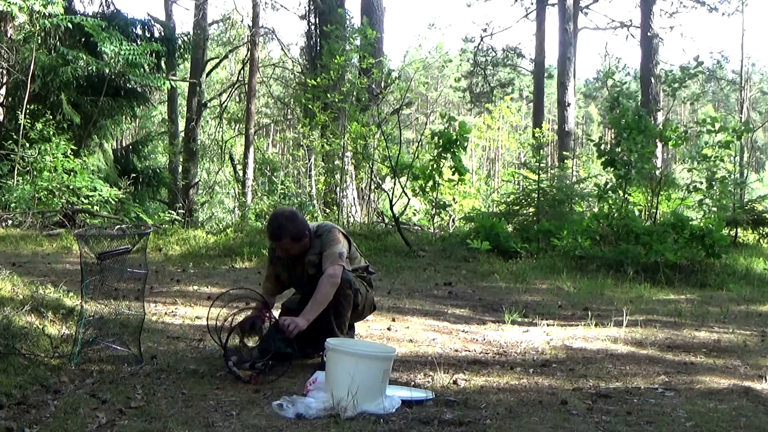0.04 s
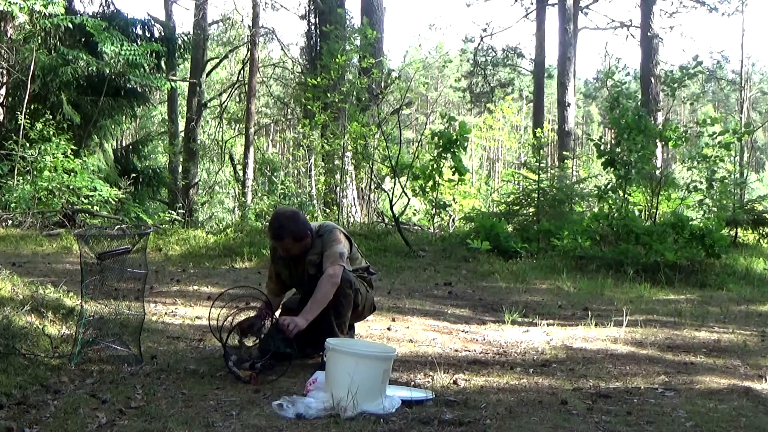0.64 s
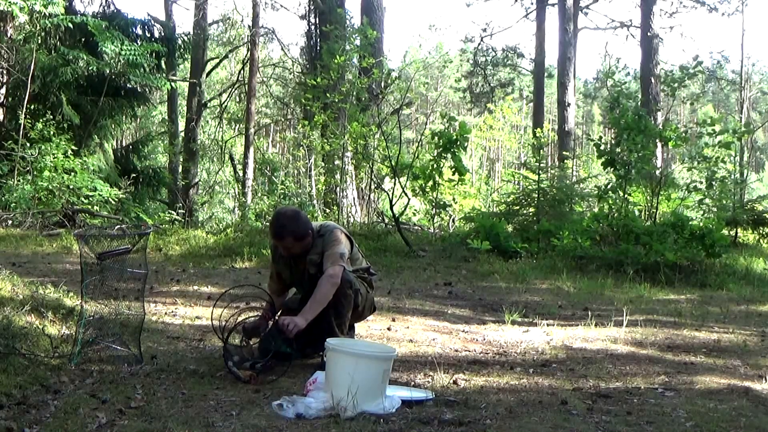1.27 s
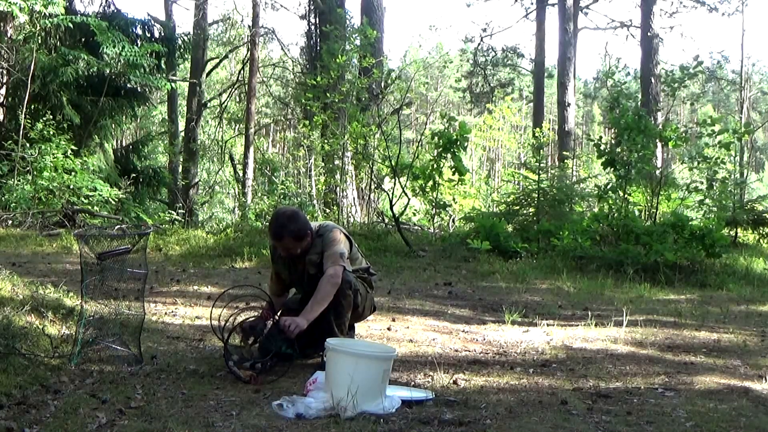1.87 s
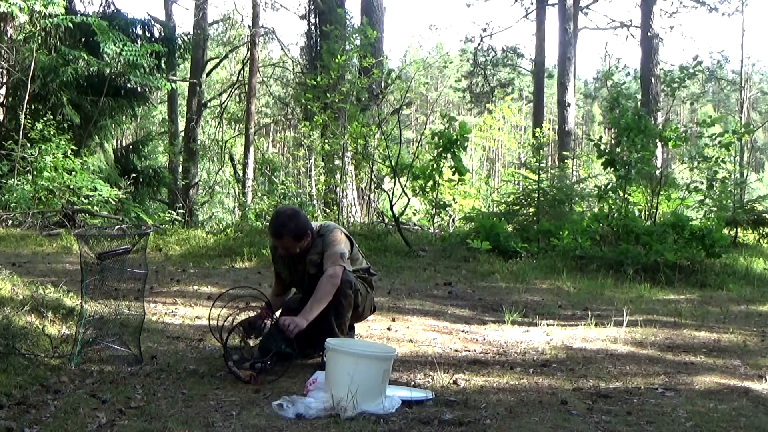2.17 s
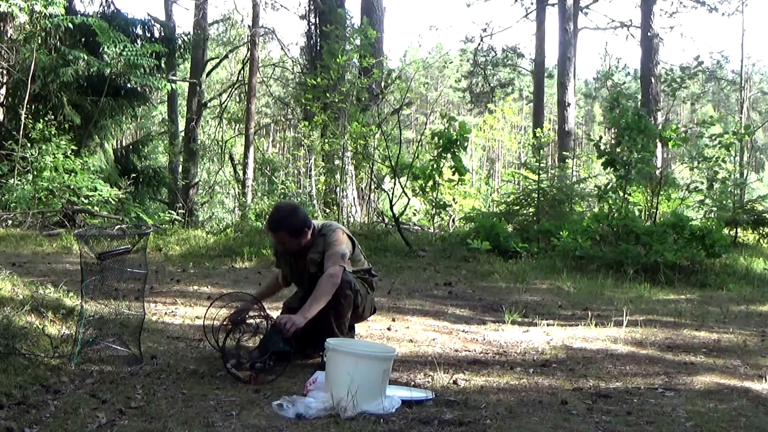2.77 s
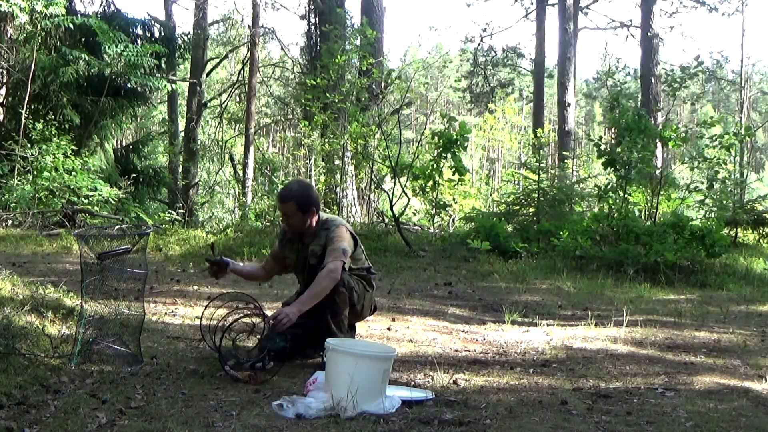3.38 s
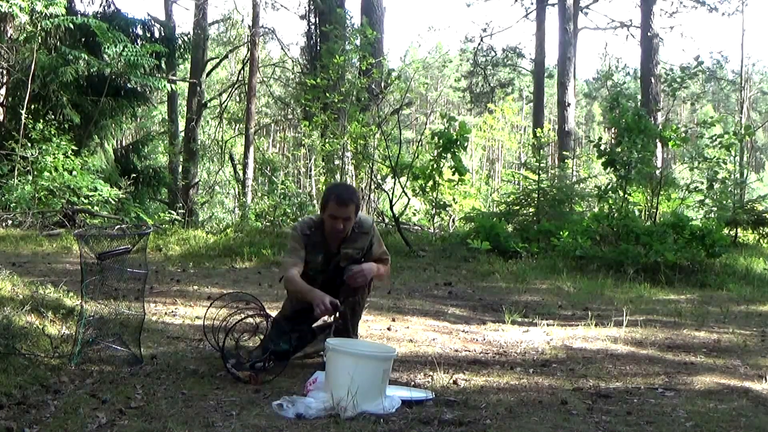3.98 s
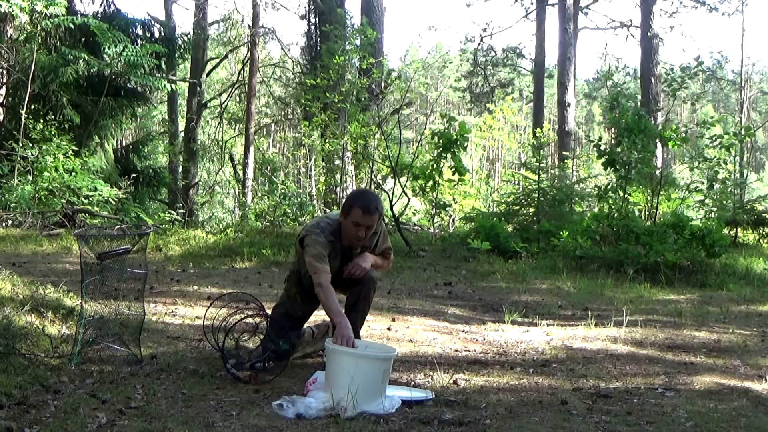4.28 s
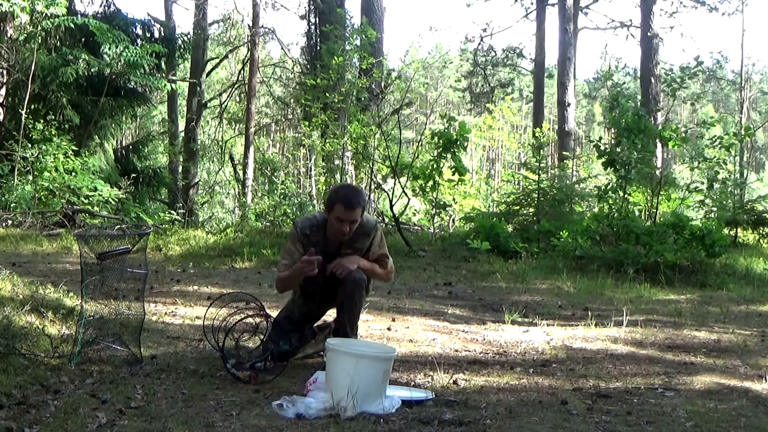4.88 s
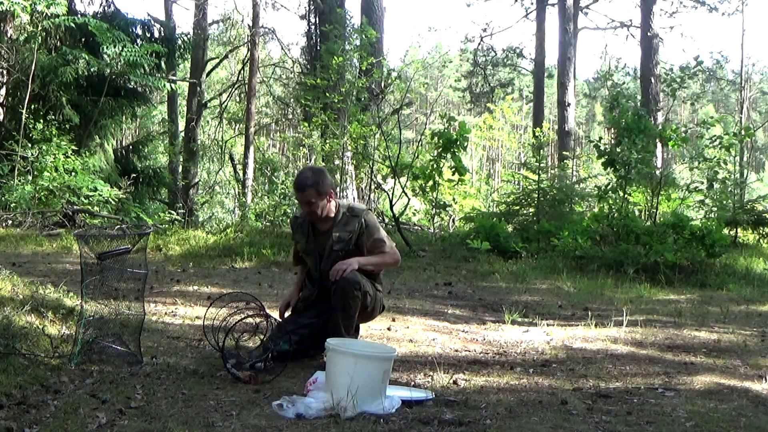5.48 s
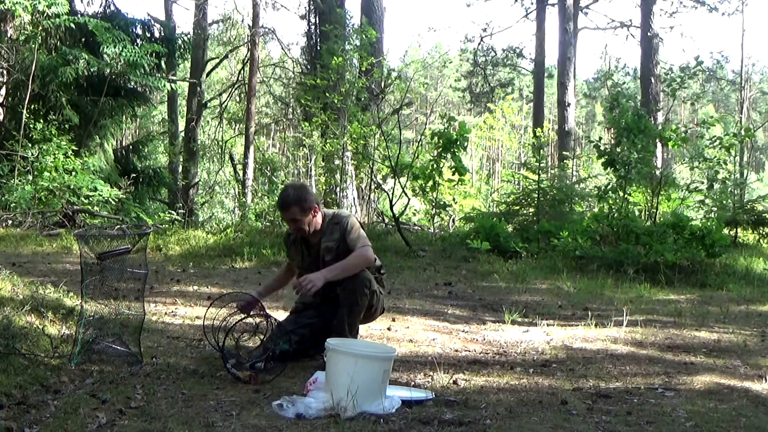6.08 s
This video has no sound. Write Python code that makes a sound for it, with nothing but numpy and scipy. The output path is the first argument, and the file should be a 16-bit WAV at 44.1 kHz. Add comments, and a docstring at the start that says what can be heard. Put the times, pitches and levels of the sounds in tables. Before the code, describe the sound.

A quiet forest hush with faint birdsong, soft clicks and rustles of a net trap, and something small clattering into a plastic bucket.

```python
"""A quiet forest: trees hush steadily and a far songbird whistles one phrase, echoed by the trunks.
Someone kneels and works on a hooped net trap: net and clothes rustle, hoops and twigs tick,
shifting weight thuds on soft soil. A small object drops into a plastic bucket and rattles to rest;
the thin wall clatters, the bottom booms. Lighter knocks on the bucket follow."""
import sys
import numpy as np
from scipy import signal
from scipy.fft import rfft, irfft, next_fast_len
from scipy.io import wavfile
from scipy.ndimage import uniform_filter1d

SR = 44100
rng = np.random.default_rng(int(sys.argv[2]) if len(sys.argv) > 2 else 0)


def to_wav(s):
    """Save 16-bit WAV."""
    ch = np.atleast_2d(s).T  # columns
    pcm = np.round(np.clip(ch, -1, 1) * 32767)  # PCM
    wavfile.write(sys.argv[1], SR, pcm.astype(np.int16))


N = 270929
T = np.arange(N) / SR

# Movements of net and clothes. Each row: middle in seconds, length in seconds, relative level in dB,
# band centre in Hz.
MOVEMENTS = [(2.6, 0.64, -63, 8500), (3.48, 0.26, -68, 9000), (4.283, 0.34, -66, 5500),
             (4.804, 0.16, -52, 1210), (5.177, 0.31, -56, 1190), (5.497, .25, -62, 8000),
             (5.62, 0.53, -61, 1990), (5.921, 0.15, -57.5, 6040)]


def undb(db):
    """Decibels to gain."""
    return 10 ** (np.asarray(db) / 20)


def unit(x):
    """Scale to rms 1."""
    return x / (np.std(x) + 1e-12)


def add(out, start_s, x):
    """Mix x into out from start_s."""
    i = int(np.clip(start_s * SR, 0, N - 1))
    out[i:i + len(x)] += x[:N - i]


def butter(x, hz, kind, order=2):
    """High- or low-pass."""
    return signal.sosfilt(signal.butter(order, hz, kind, fs=SR, output="sos"), x)


def colour(x, points):
    """Minimum-phase filter through (Hz, dB) points."""
    hz, db = np.transpose(points)
    size = 2 * next_fast_len(N)
    grid_hz = np.maximum(np.fft.rfftfreq(size, 1 / SR), 1)
    gain = undb(np.interp(np.log(grid_hz), np.log(hz), db))
    cepstrum = irfft(np.log(gain))
    cepstrum[1:size // 2] *= 2
    cepstrum[size // 2 + 1:] = 0
    return irfft(rfft(x, size) * np.exp(rfft(cepstrum)))[:N]


def resonate(x, hz, width_hz):
    """One resonance, gain 1 at its centre."""
    return signal.lfilter(*signal.iirpeak(hz, hz / width_hz, fs=SR), x)


def walk(rate_hz):
    """Smooth random wander, spread 1."""
    hold = int(SR / rate_hz)
    steps = np.repeat(rng.standard_normal(N // hold + 1), hold)
    return unit(uniform_filter1d(uniform_filter1d(steps, hold), hold)[:N])


def fade(t60_s):
    """Exponential decay, 60 dB down at its end."""
    return np.exp(-np.log(1000) * T[T < t60_s] / t60_s)


def ring(hz, t60_s):
    """Struck mode: a decaying sine."""
    shape = fade(t60_s)
    return shape * np.sin(2 * np.pi * hz * T[:len(shape)])


def burst(t60_s, rise_s=0.00044):
    """Contact noise: abrupt start, exponential decay."""
    shape = fade(t60_s)
    return rng.standard_normal(len(shape)) * shape * (1 - np.exp(-T[:len(shape)] / rise_s))


def scatter(x, t60_s):
    """Dense reflections: convolution with decaying noise of unit energy."""
    shape = fade(t60_s)
    response = rng.standard_normal(len(shape)) * shape
    return signal.fftconvolve(x, response / np.linalg.norm(response))[:N]


def widen(x, lag_s=0.00298):
    """Sound scattered by the surroundings arrives differently left and right."""
    # Stereo width. Each row: frequency in Hz, side minus mid in dB.
    side_curve = [(100, -11), (350, -16), (1200, -11), (2400, -12), (4500, -25), (9000, -23), (14000, -47)]
    side = np.zeros(N)
    add(side, lag_s, scatter(x, t60_s=0.02))
    side = colour(side, side_curve)
    return np.array([x + side, x - side])


def forest(mid_db=-53, sway_db=0.25, side_db=-0.5, hum_hz=52.2, drift_hz=0.33, hum_db=-69):
    """Even hush of far trees and hiss, swaying slightly, with a faint low hum."""
    # Hush spectrum. Each row: frequency in Hz, relative density in dB.
    spectrum = [(20, -9.5), (45, -3.5), (85, -9), (160, -5.5), (400, -0.54), (1000, -3.5), (1600, -11),
                (3000, -17.5), (5300, -21.5), (6600, -17.5), (8600, -18.5), (11000, -27), (15500, -34)]
    # Stereo width. Each row: frequency in Hz, relative side gain in dB.
    side_curve = [(60, -22), (110, -14.5), (200, -12), (380, -13), (700, -9), (1290, -4.5), (2380, -5),
                  (4400, -5.5), (8120, -8), (15000, -37.5)]
    mid, side = (colour(rng.standard_normal(N), spectrum) for _ in range(2))
    side = undb(side_db) * colour(side, side_curve)
    hush = np.array([mid + side, mid - side]) / np.std(mid)
    hush *= undb(mid_db + sway_db * walk(rate_hz=1.43))
    hum = np.sin(2 * np.pi * np.cumsum(hum_hz + drift_hz * walk(rate_hz=3.73)) / SR)
    return hush + undb(hum_db) * hum


def bird(trill_hz=70, swing_hz=260, arch_hz=69.4, flutter=0.41, gain_db=-1, echo_db=-2, echo_t60_s=0.45):
    """Gliding whistles, some trilled, smeared by echoes from the trunks."""
    # Each row: start in seconds, length in seconds, relative level in dB, start pitch in Hz,
    # end pitch in Hz, trill depth from 0 to 1.
    notes = [(2.165, 0.057, -63, 3050, 2760, 0), (2.62, 0.048, -58.5, 2130, 2640, .3),
             (2.8, .04, -61, 3010, 2190, 0.1), (2.83, 0.036, -60, 2280, 2710, 0),
             (3.076, 0.047, -55.5, 2290, 2790, 0), (3.375, .055, -62.5, 2150, 1990, 0),
             (3.547, 0.043, -61, 3300, 3570, 0), (3.82, .025, -55, 3210, 2400, 0.1),
             (3.929, .03, -57, 2445, 2800, 0.93), (4.091, .085, -57, 2596, 2390, 0.85),
             (4.213, 0.044, -57.5, 2700, 1960, 0)]
    song = np.zeros(N)
    for start_s, length_s, db, from_hz, to_hz, depth in notes:
        t = T[T < length_s]
        trill = depth * np.sin(2 * np.pi * trill_hz * t)
        glide_hz = from_hz + (to_hz - from_hz) * t / length_s
        hz = glide_hz + arch_hz * np.sin(np.pi * t / length_s) + swing_hz * trill
        shape = signal.windows.tukey(len(t), 0.6) * (1 + trill / 2)
        add(song, start_s, undb(db + gain_db) * shape * np.sin(2 * np.pi * np.cumsum(hz) / SR))
    song *= 1 + flutter * walk(rate_hz=250)  # slight hoarseness
    echoes = np.array([scatter(song, echo_t60_s) for _ in range(2)])
    return song + undb(echo_db) * echoes


def rustles(grain_db=4.0, grain_samples=32, width_ratio=0.83, gain_db=-1.5, top_hz=10500):
    """Threads catch on each other: dense, uneven clicks swell with each movement."""
    out = np.zeros(N)
    for middle_s, length_s, db, hz in MOVEMENTS:
        n = int(length_s * SR)
        sizes_db = grain_db * np.minimum(rng.exponential(size=n // grain_samples + 1), 4)
        grains = np.repeat(undb(sizes_db), grain_samples)[:n] * rng.standard_normal(n)
        band = unit(resonate(grains, hz, width_ratio * hz))
        add(out, middle_s - length_s / 2, undb(db + gain_db) * np.hanning(n) * band)
    return butter(out, top_hz, "low", order=3)


def weight_shift(start_s=4.9, gap_s=0.045, count=10, jitter=0.252, db=-41, scatter_db=2.0, hz=62.4):
    """Weight moves from knee to foot: an uneven run of thuds, as rows for bumps()."""
    return [(start_s + gap_s * (k + jitter * when), db + scatter_db * size, hz * np.exp(0.08 * pitch))
            for k, (when, size, pitch) in enumerate(rng.standard_normal((count, 3)))]


def bumps(t60_at_70hz_s=0.065, rise_s=0.0037, gain_db=4.0):
    """Soft soil gives low, heavily damped thuds."""
    # Each row: start in seconds, relative level in dB, pitch in Hz.
    thuds = [(.252, -31.5, 226), (.257, -42, 150), (5.06, -35.5, 79), (5.302, -38, 72.4), (5.386, -41, 70)]
    out = np.zeros(N)
    for start_s, db, hz in thuds + weight_shift():
        thud = ring(hz, t60_at_70hz_s * np.sqrt(70 / hz))
        onset = 1 - np.exp(-T[:len(thud)] / rise_s)
        add(out, start_s, undb(db + gain_db) * thud * onset)
    return out


def snags(rate_per_s=5, db=-55.5, scatter_db=1, hz=3800, spread_octaves=0.21):
    """The mesh catches around each movement: faint snaps, as rows for ticks()."""
    rows = []
    for middle_s, length_s, _, _ in MOVEMENTS:
        count = int(np.ceil(rate_per_s * length_s))
        for when, size, pitch in rng.standard_normal((count, 3)):
            start_s = middle_s + when * length_s / 2
            rows.append((start_s, db + scatter_db * size, hz * 2 ** (spread_octaves * pitch), 0))
    return rows


def ticks(t60_s=0.017, upper_ratio=2.2, width_ratio=0.58, gain_db=1, top_hz=12500):
    """Hoops, twigs and plastic snap: short bursts ring two broad resonances."""
    # Each row: start in seconds, relative level in dB, lower resonance in Hz, upper minus lower in dB.
    snaps = [(0.2515, -42, 2930, -1), (.2525, -38.5, 483, -4), (.455, -40, 1910, -5.5),
             (.473, -47, 2000, -10), (1.2502, -42.5, 1610, -11), (1.698, -55, 5000, 8),
             (1.7659, -42, 4500, 8), (2.362, -43.5, 1710, -9), (4.2787, -47, 1800, -12),
             (4.3152, -43, 1950, -17), (4.433, -54, 4100, 6.5), (4.69, -44, 3500, 0),
             (5.6832, -47, 1950, 1), (5.7716, -43, 1670, -2.5), (5.782, -37, 430, -9),
             (6.1206, -40, 1800, -5.5)]
    out = np.zeros(N)
    for start_s, db, lower_hz, upper_db in snaps + snags():
        for hz, share_db in (lower_hz, 0), (upper_ratio * lower_hz, upper_db):
            snap = burst(t60_s)
            width_hz = width_ratio * hz
            tone = resonate(resonate(snap, hz, width_hz), hz, width_hz)
            add(out, start_s, undb(db + share_db + gain_db) * np.std(snap) * unit(tone))
    return butter(out, top_hz, "low", order=3)


def rattle(start_s=4.771, gap_s=0.02, count=5, jitter=0.15, clack_db=-35.5, boom_db=-39, loss_db=2.5):
    """The object settles: nearly even bounces, each weaker, as rows for bucket()."""
    bounce = np.arange(count)
    times_s = start_s + gap_s * (bounce + jitter * rng.standard_normal(count))
    t60_s = 0.052
    return [(s, clack_db - k * loss_db, boom_db - k * loss_db, t60_s) for k, s in enumerate(times_s)]


def bucket_wall(scrape, modes_db=-7, clack_db=-4.5, max_q=50):
    """The scraped thin wall clatters: resonances plus a broadband clack."""
    # Each row: frequency in Hz, minimum width in Hz, relative level in dB.
    wall_modes = [(904, 17, -2), (1190, 79, -11), (1410, 32, -4), (1697, 310, 7.5), (1916, 22, 9),
                  (2054, 30, 7), (2280, 99, 2), (2510, 49, -11), (2980, 23, -14), (3190, 35, -2),
                  (3600, 95, -7), (4370, 100, -4), (4880, 88, -11), (5180, 170, -30), (5960, 130, -32)]
    # Each row: frequency in Hz, relative density in dB.
    clack_spectrum = [(130, -20), (250, -16), (420, 7), (650, 1.5), (1050, -4), (1800, 1), (2900, -23),
                      (4000, -15.5), (5600, -24), (9000, -18.5), (11500, -25), (15500, -55)]
    # Losses in the plastic cap Q, so higher modes die faster.
    ringing = sum(undb(db) * resonate(scrape, hz, max(width_hz, hz / max_q))
                  for hz, width_hz, db in wall_modes)
    clack = colour(scrape, clack_spectrum)
    return np.std(scrape) * (undb(modes_db) * unit(ringing) + undb(clack_db) * unit(clack))


def bucket_bottom(push, yield_hz=900, leak_hz=132):
    """Each push rings the bottom and the air in the bucket: a boom."""
    # Each row: frequency in Hz, relative level in dB, T60 in seconds.
    bottom_modes = [(149, -15.5, 0.13), (316.3, -5, 0.15), (336.6, -9.5, 0.14), (384, -29, 0.063),
                    (483, -22, 0.13), (545, -23, 0.11)]
    boom = sum(undb(db) * signal.fftconvolve(push, ring(hz, t60_s))[:N] for hz, db, t60_s in bottom_modes)
    boom = butter(boom, yield_hz, "low")  # the plastic yields softly
    return butter(boom, leak_hz, "high", order=4)  # a small bucket radiates no deep bass


def bucket(dull_hz=2500, hard_db=-28):
    """Each contact scrapes the wall and pushes the bottom; light contacts are duller."""
    # Each row: start in seconds, wall drive in dB, bottom drive in dB, scrape T60 in seconds.
    contacts = [(4.434, -37, -37.5, .04), (4.647, -39.5, -49, 0.044), (4.6895, -31.5, -63, 0.028),
                (4.7046, -29.5, -26.5, 0.054), (4.7106, -16.5, -16.5, 0.025), (4.7251, -24, -52, 0.098),
                (4.7366, -32, -26, .031), (4.7448, -26.5, -60, 0.06), (4.749, -50, -34, .026),
                (5.0462, -34.5, -37, 0.032), (5.276, -37, -52, .04), (5.291, -37.5, -40.5, .06),
                (5.685, -44, -46, .033), (5.742, -41.5, -49, 0.076), (5.781, -39.5, -39, 0.042),
                (5.935, -39.5, -44, .048), (6.075, -46, -43, .02)]
    scrape, push = np.zeros(N), np.zeros(N)
    for start_s, clack_db, boom_db, t60_s in contacts + rattle():
        grit = burst(t60_s)
        dull = butter(grit, dull_hz, "low", order=1)
        hardness = min(undb(clack_db - hard_db), 1)
        add(scrape, start_s, undb(clack_db) * (hardness * grit + (1 - hardness) * dull))
        add(push, start_s, undb([boom_db]))
    return bucket_wall(scrape) + bucket_bottom(push)


def scene():
    """Work a few metres ahead, forest all around."""
    return widen(bucket() + ticks() + rustles() + bumps()) + bird() + forest()


def record(dry, top_hz=15800):
    """Steep low-pass on the top treble."""
    return signal.sosfilt(signal.ellip(10, 0.1, 70, top_hz, fs=SR, output="sos"), dry)


dry = scene()
out = record(dry)
to_wav(out)
```